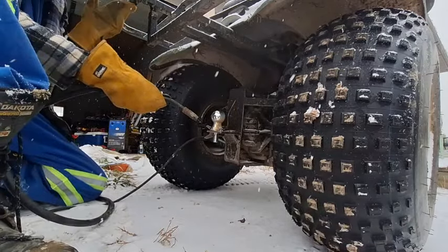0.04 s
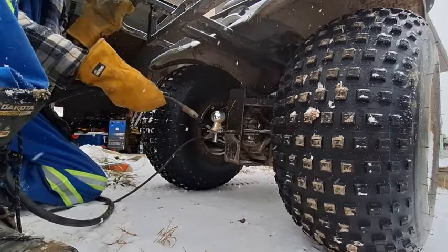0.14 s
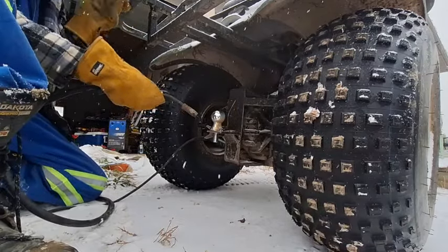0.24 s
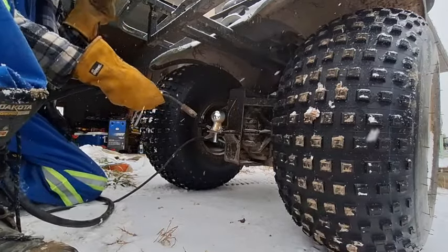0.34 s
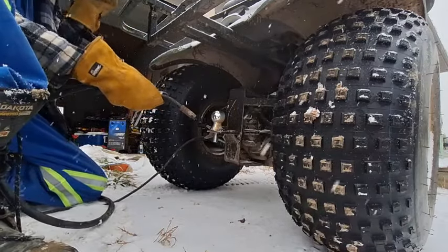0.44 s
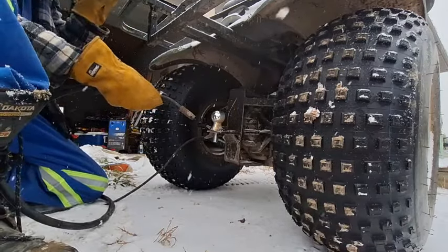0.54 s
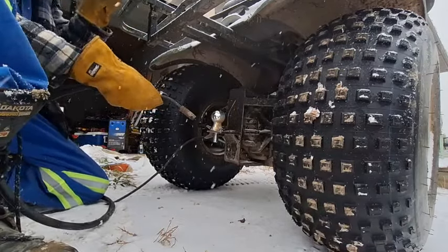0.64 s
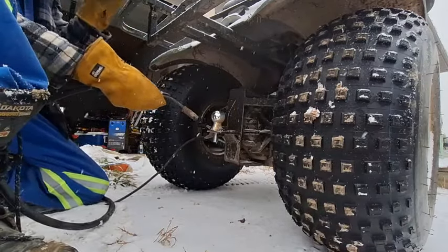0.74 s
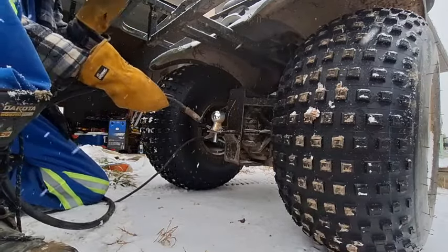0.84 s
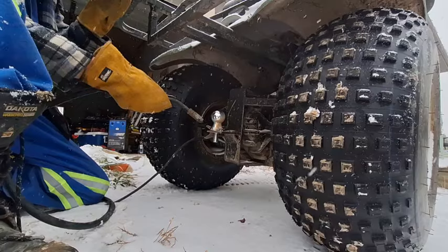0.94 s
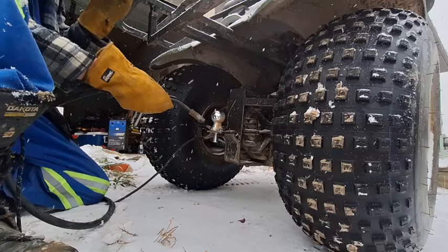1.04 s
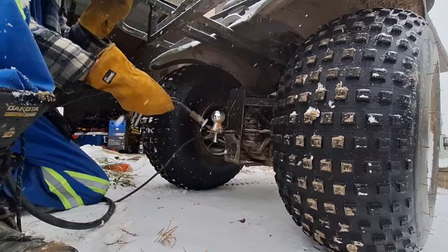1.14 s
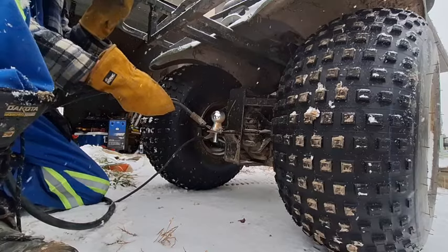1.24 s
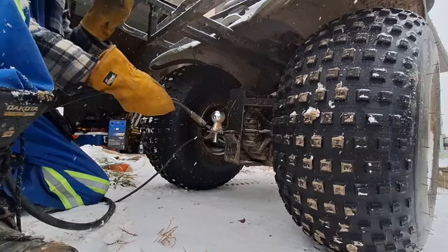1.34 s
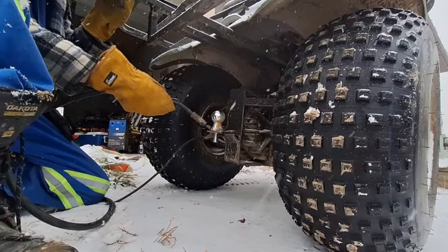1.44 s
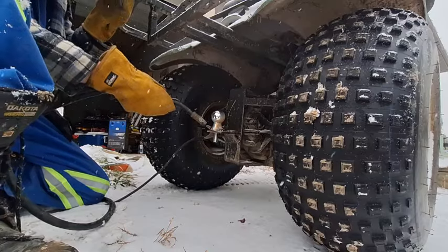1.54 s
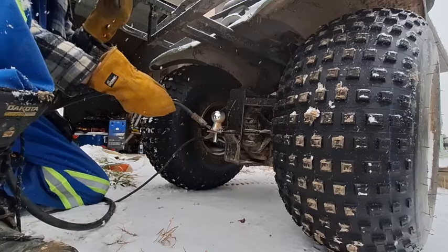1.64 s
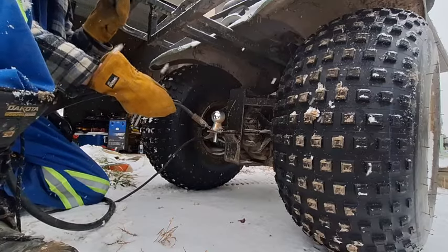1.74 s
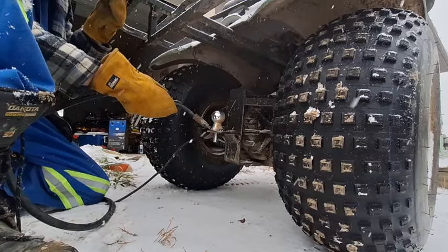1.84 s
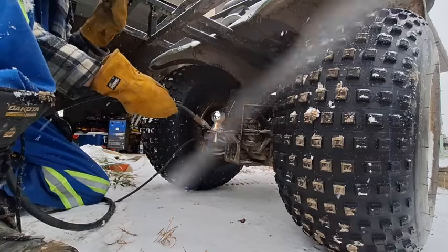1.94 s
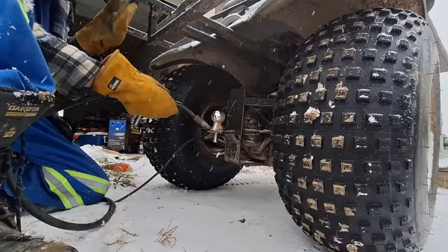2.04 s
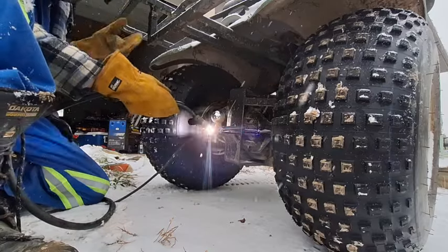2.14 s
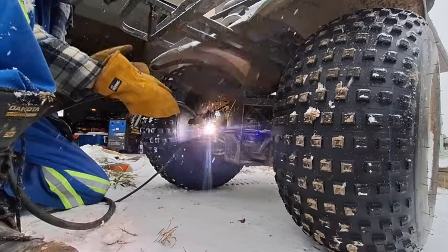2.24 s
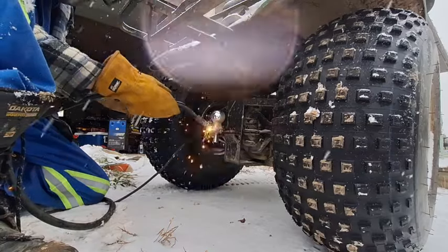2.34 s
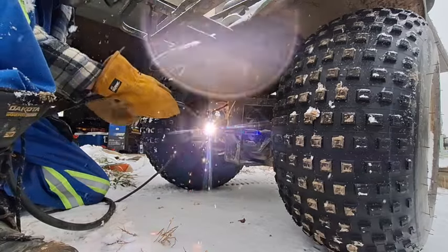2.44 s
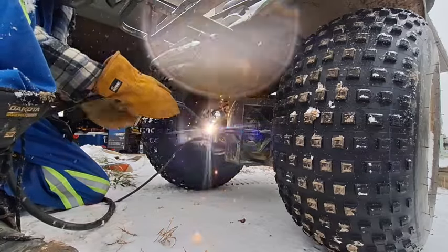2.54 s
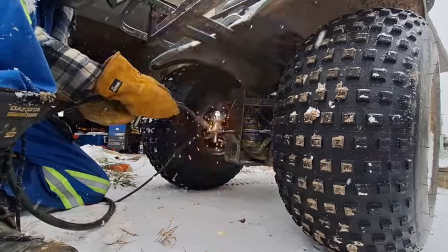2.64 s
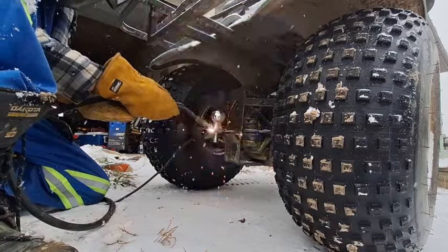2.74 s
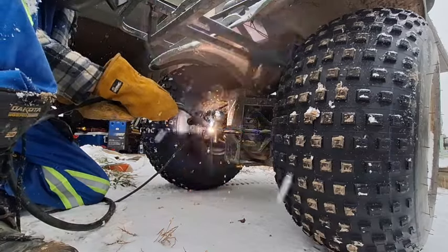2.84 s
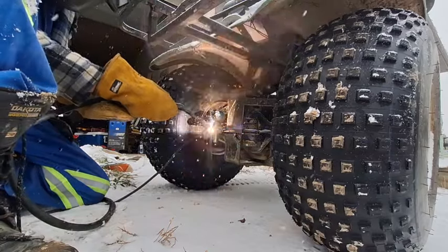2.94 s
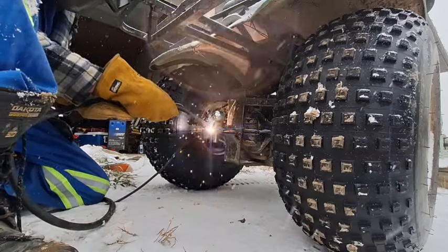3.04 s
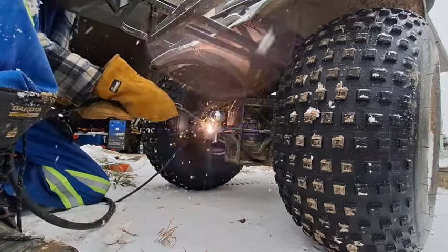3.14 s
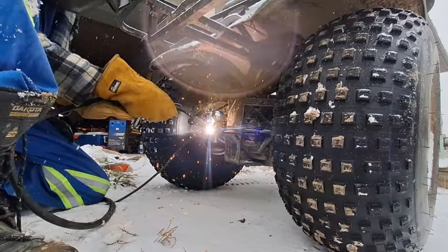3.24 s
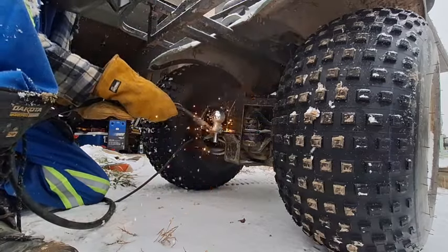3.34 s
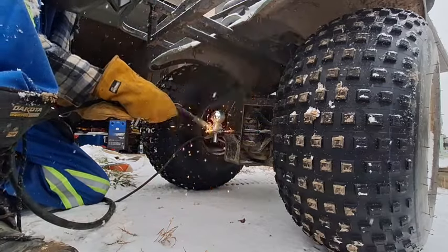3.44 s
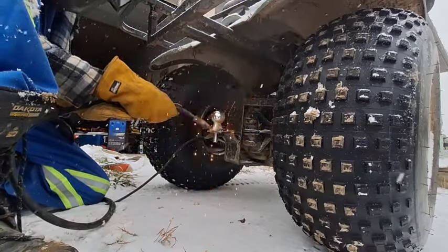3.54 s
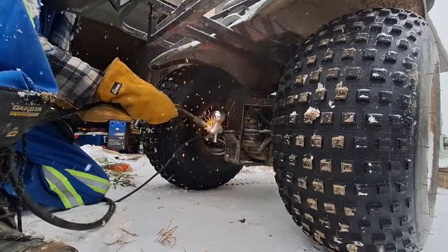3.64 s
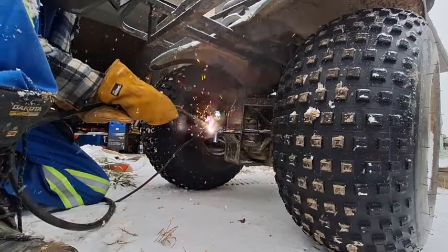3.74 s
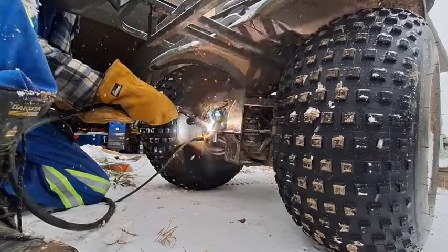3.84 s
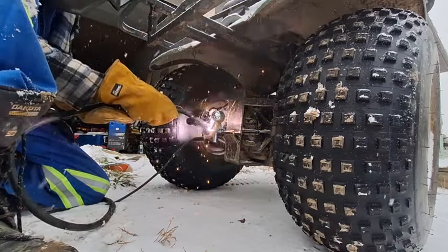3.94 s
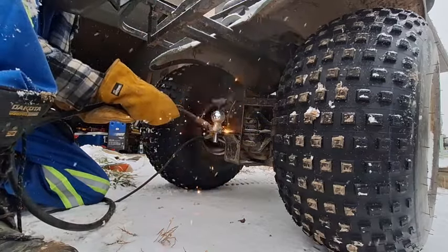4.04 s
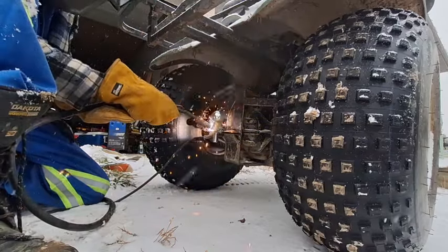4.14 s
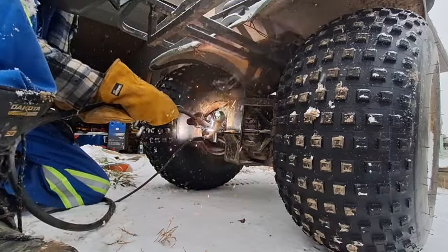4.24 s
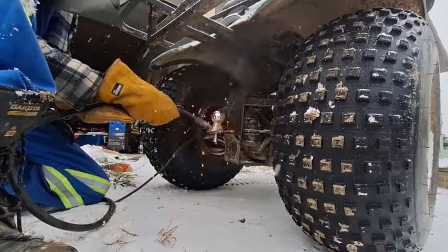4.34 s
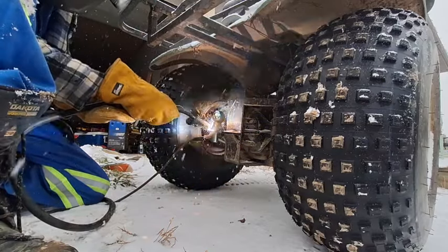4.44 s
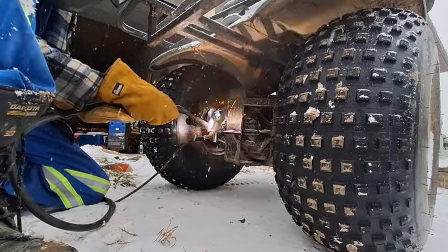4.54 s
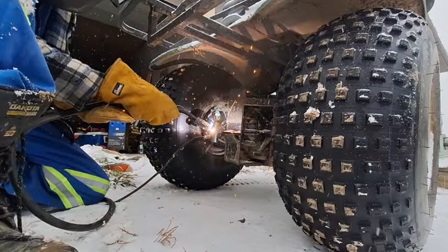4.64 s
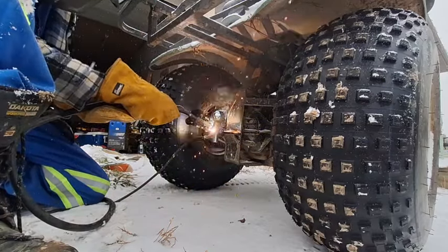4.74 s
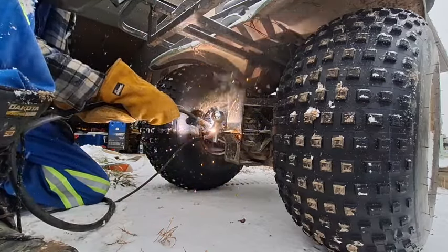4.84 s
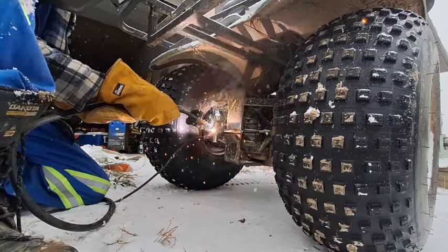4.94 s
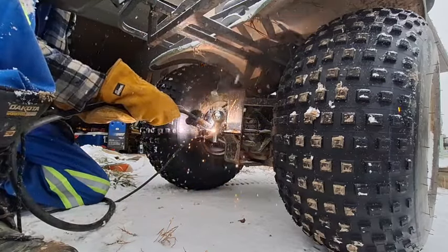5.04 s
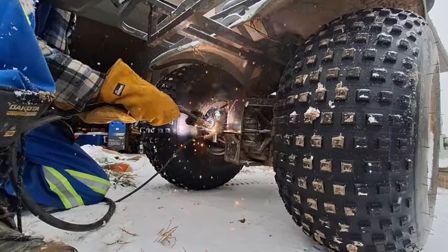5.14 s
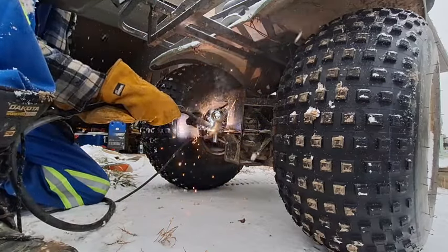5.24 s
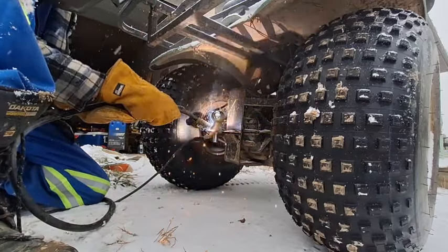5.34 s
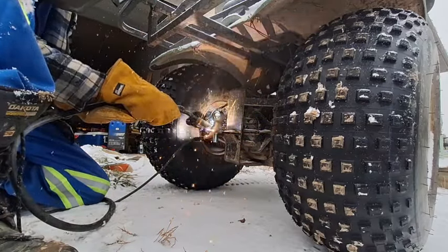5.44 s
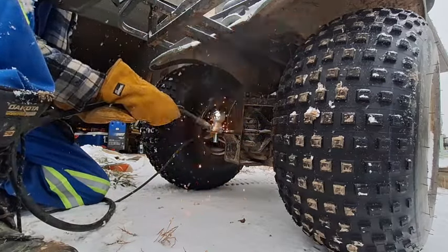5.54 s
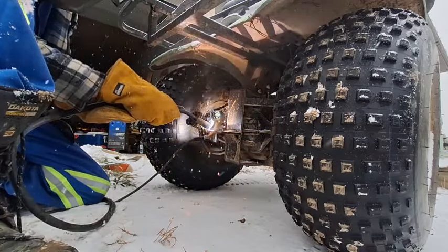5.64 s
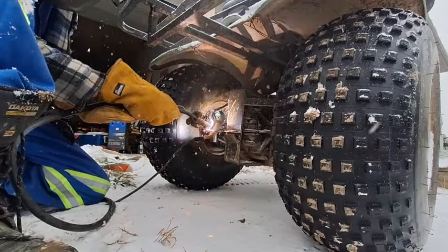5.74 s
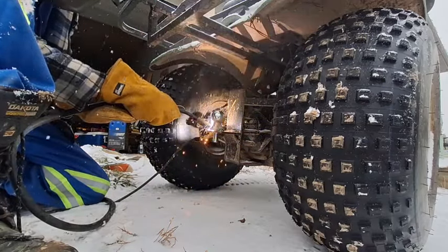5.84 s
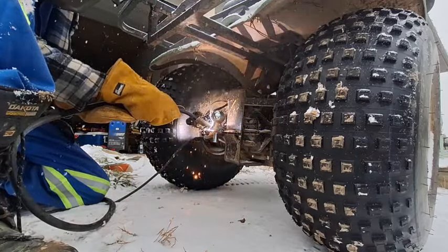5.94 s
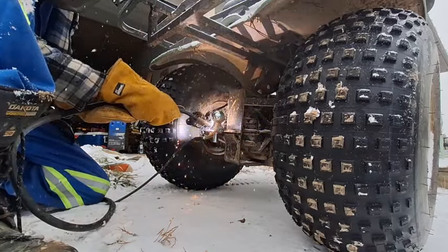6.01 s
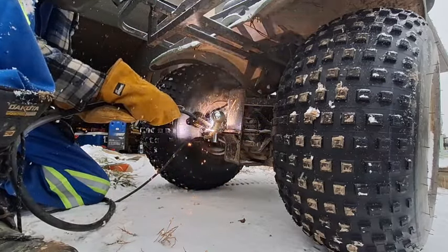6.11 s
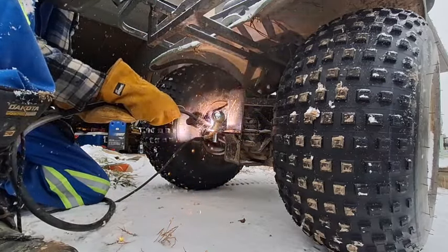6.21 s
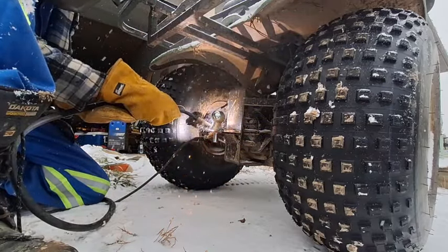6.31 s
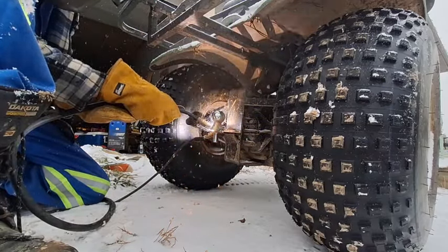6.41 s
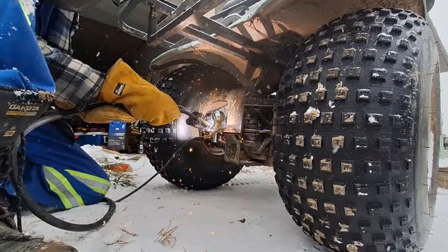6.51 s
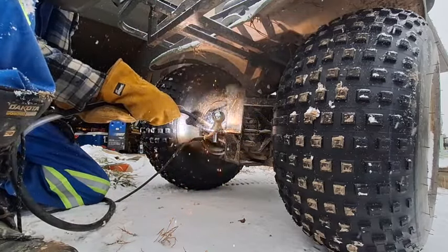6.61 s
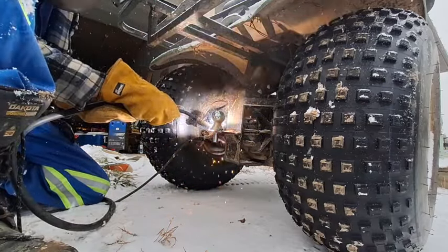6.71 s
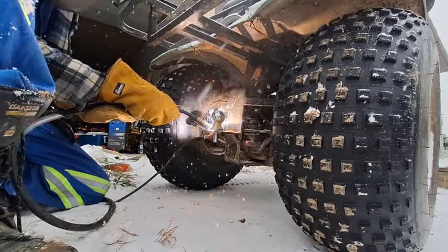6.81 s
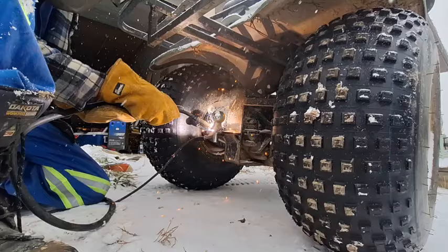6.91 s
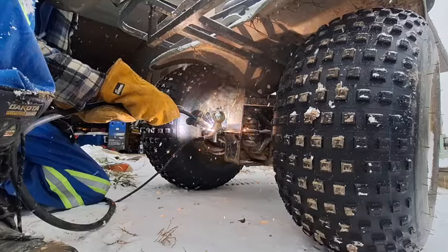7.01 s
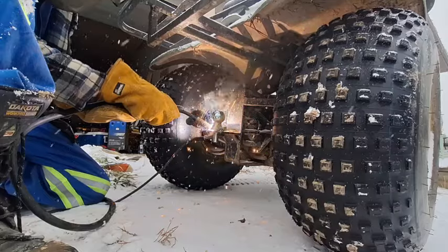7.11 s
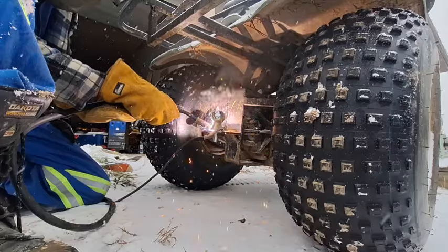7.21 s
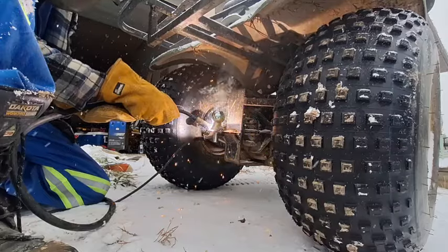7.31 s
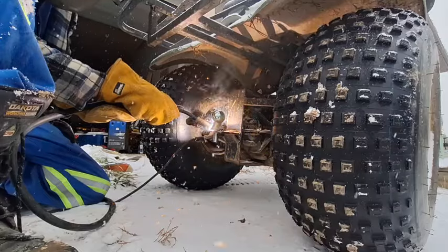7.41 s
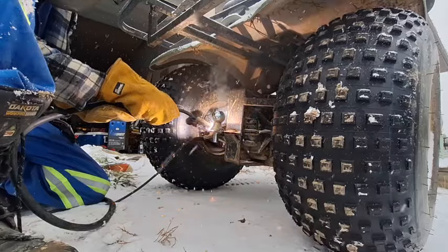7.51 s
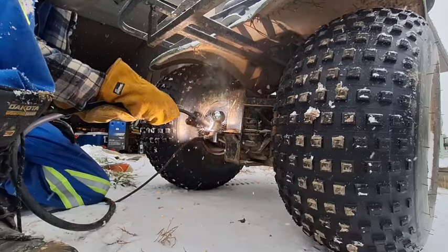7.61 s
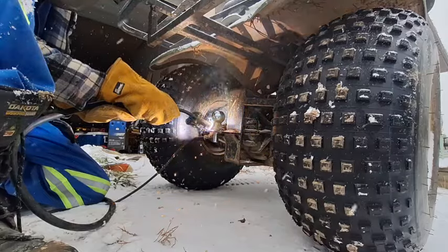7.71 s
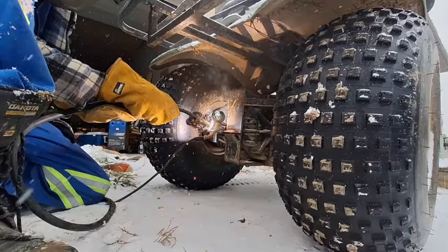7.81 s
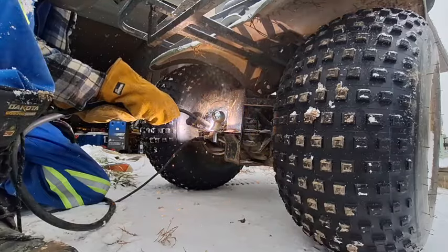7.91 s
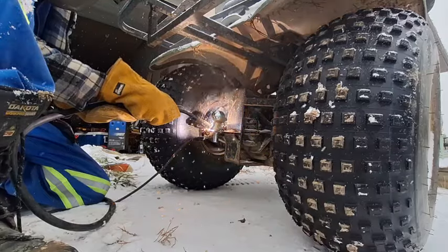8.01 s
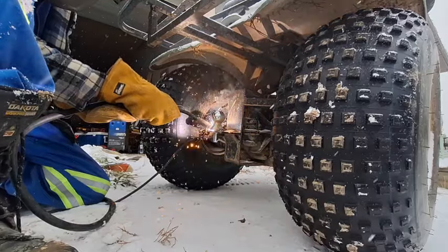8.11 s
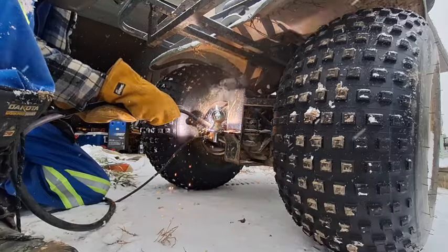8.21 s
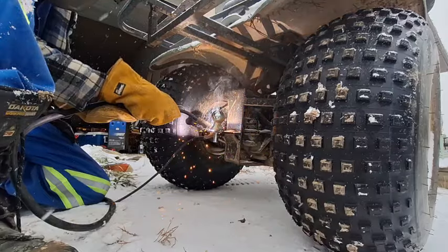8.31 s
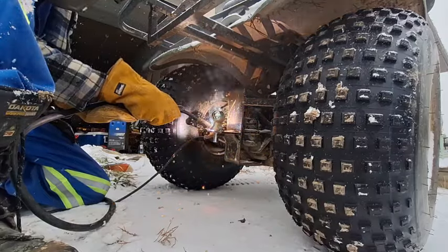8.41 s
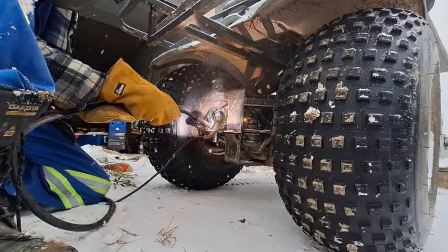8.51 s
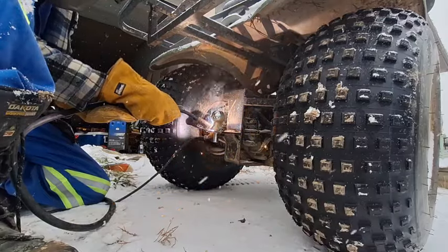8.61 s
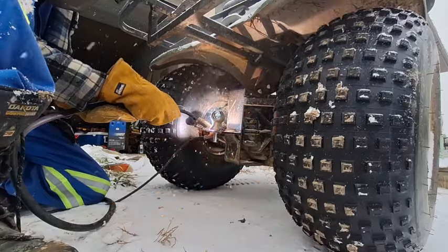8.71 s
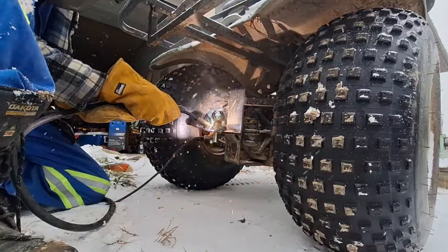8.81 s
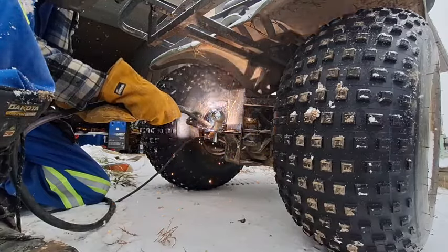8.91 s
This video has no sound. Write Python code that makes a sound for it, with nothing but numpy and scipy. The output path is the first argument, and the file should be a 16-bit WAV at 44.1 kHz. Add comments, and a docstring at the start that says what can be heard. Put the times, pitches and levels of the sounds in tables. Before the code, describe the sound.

Outdoors, quiet distant traffic and faint ticks, then a metallic tap and an electric arc welder crackles in bursts before settling into one long sizzling bead.

```python
"""Far traffic, faint ticks and a rustling sleeve come first; then an electrode taps steel and a mains arc welder
strikes, burning in bursts and a long bead under a trailer. Impulses and spark noise in step with the rectified
mains ring the steel frame through decaying sines and scatter in noise echoes. Sines make the transformer hum
under load and the drone and whine of a far engine; filtered noise makes traffic, cloth, ticks, short bursts
and gas puffs."""
import sys
import numpy as np
from scipy import signal
from scipy.fft import rfft, irfft
from scipy.io import wavfile
from scipy.ndimage import uniform_filter1d

SR = 44100
rng = np.random.default_rng(int(sys.argv[2]) if len(sys.argv) > 2 else 0)


def pcm_store(signal):
    """Save signal as 16-bit PCM."""
    levels = np.round(np.clip(np.atleast_2d(signal), -1, 1) * 32767)
    wavfile.write(sys.argv[1], SR, levels.astype(np.int16).T)


def invert_db(level):
    """Linear amplitude ratio for a level in decibels (20 dB per decade), elementwise."""
    return 10 ** (np.asarray(level, dtype=float) / 20)


N = 395136
T = np.arange(N) / SR
RIPPLE_HZ = 119.965  # rectified mains: twice the mains rate

# Loud pops of the arc. Each row: time in seconds, kick level in dB.
POPS = [(1.8268, -19.5), (2.1741, -17.5), (2.2102, -23.5), (2.2682, -24), (2.311, -23.5), (2.3692, -21.5),
        (2.3907, -17.5), (2.7753, -17), (2.7862, -17), (2.809, -20.5), (2.8936, -30), (3.1502, -19),
        (3.1677, -20.5), (3.1832, -15.5), (3.434, -15.5), (3.6242, -15), (3.667, -23), (3.677, -20.5),
        (3.7166, -16.5), (3.7855, -19), (3.8257, -18), (3.976, -22.5), (4.0837, -17), (4.0937, -20.5),
        (4.102, -17), (4.142, -20.5), (4.159, -19.5), (4.176, -21.5), (4.2937, -24.5), (4.468, -21.5),
        (4.5104, -13), (4.5942, -18), (4.6688, -18.5), (4.784, -16), (5.2157, -18.5), (5.261, -19.5),
        (5.427, -23.5), (5.602, -19), (5.6845, -16), (5.8607, -23.5), (6.0945, -20.5), (6.1947, -22.5),
        (6.7428, -19.5), (6.8683, -23), (7.268, -22), (7.6275, -19), (7.677, -19.5), (7.6848, -19.5),
        (7.8358, -22.5), (8.2769, -22), (8.3603, -20), (8.9185, -21)]
# Spells in which the arc is alight. Each row: strikes in seconds, goes out in seconds.
LIT = [(1.84, 1.851), (2.122, 2.226), (2.268, 2.284), (2.31, 2.625), (2.775, 3.303), (3.4, 3.445),
       (3.625, 3.94), (3.975, 4.007), (4.084, 4.329), (4.468, 5.52), (5.6, 8.96)]


def coloured(x, hz, db):
    """Causal minimum-phase filter of the given gain shape (built from the cepstrum), noise gain 1."""
    f = np.linspace(1, SR / 2, 2049)
    gain_db = np.interp(np.log(f), np.log(hz), db)
    cepstrum = irfft(np.log(invert_db(gain_db)))
    cepstrum[1:2048] *= 2
    cepstrum[2049:] = 0
    h = irfft(np.exp(rfft(cepstrum)))
    return signal.fftconvolve(x, h / np.sqrt(np.sum(h ** 2)))[:N]


def band(x, hz, width_hz):
    """Resonant band-pass, gain 1 at its centre."""
    return signal.lfilter(*signal.iirpeak(hz, hz / width_hz, SR), x)


def walk(rate_hz):
    """Random levels held 1 / rate_hz and slewed twice; spread near 1."""
    k = int(SR / rate_hz)
    held = np.repeat(rng.standard_normal(N // k + 1), k)
    return 1.59 * uniform_filter1d(uniform_filter1d(held, k), k)[:N]


def fade(power, t60_s):
    """Lets a power curve die away exponentially, 60 dB in t60_s."""
    return signal.lfilter([1], [1, -1e-6 ** (1 / (t60_s * SR))], power)


def traffic(level_db=-47.5):
    """Far road rumble, slowly swelling noise; the bass is alike left and right, the upper part is not."""
    # Each row: frequency in Hz, relative level in dB per Hz.
    road_spectrum = [(30, -20.5), (50, 1.5), (85, 1), (156, -11), (230, -6), (379, -17), (455, -8),
                     (620, -19.5), (790, -13.5), (880, -15.5), (1050, -25.5), (1770, -34.5), (2130, -41.5),
                     (5310, -53), (15500, -67)]
    hz, db = np.transpose(road_spectrum)
    mid = coloured(rng.standard_normal(N), hz, db)
    side = coloured(rng.standard_normal(N), hz, db)
    side = side - 0.56 * band(side, 100, 600)
    swell_db = 0.9 * walk(3.58)
    return invert_db(level_db + swell_db) * (mid + side * np.array([[1], [-1]]))


def engine(whine_db=-61.0):
    """Far engine: a falling firing tone and a thin whine, both wavering with the air."""
    # Each row: time in seconds, firing rate in Hz, rms level in dB; both before wavering.
    drone = [(0, 85, -69), (1.6, 81.8, -62.5), (2.3, 81, -47), (3.6, 80.2, -42.5), (5.3, 77.3, -40),
             (6.4, 77.05, -49.5), (7, 75.4, -40.5), (7.7, 74.5, -38), (8.6, 73, -41.5), (8.96, 72.5, -36)]
    s, *columns = np.transpose(drone)
    hz, db = (np.interp(T, s, c) for c in columns)
    firing_hz = hz + 1.365 * walk(7)
    firing = invert_db(db + 1.34 * walk(8.7)) * np.sin(2 * np.pi * np.cumsum(firing_hz) / SR)
    whine_hz = np.interp(T, [0, 4.6], [285, 263]) + 1.455 * walk(5)
    whine = invert_db(whine_db + 4.6 * walk(6.8)) * np.sin(2 * np.pi * np.cumsum(whine_hz) / SR)
    return np.sqrt(2) * (firing * invert_db(np.array([[1.1], [-1.1]])) + whine)


def specks(per_s=6.1, level_db=-60.5, spread_db=0.5):
    """Tiny high ticks at random, like dry snow grains landing close by: decaying band noise."""
    hits = (rng.random(N) < per_s / SR) * invert_db(level_db + spread_db * rng.standard_normal(N))
    shape = np.sqrt(fade(hits ** 2, 0.018))
    return band(shape * rng.standard_normal((2, N)), 8600.0, 9000.0)


def ticks():
    """Faint dry clicks nearby: decaying noise, each in its own band."""
    # Each row: start in seconds, peak level in dB, centre in Hz.
    faint_ticks = [(.3, -48, 2280), (.343, -51, 7300), (.579, -54, 1700), (0.959, -46.5, 2300),
                   (1.285, -47.5, 2230), (1.37, -53, 7000), (1.709, -54, 6900), (2.04, -52, 8000)]
    out, t = np.zeros((2, N)), T[:800]
    for s, db, hz in faint_ticks:
        burst = rng.standard_normal((2, len(t))) * np.exp(-t / 0.0076)
        click = band(burst, hz, 0.3 * hz)
        i = int(s * SR)
        out[:, i:i + len(t)] += invert_db(db) * click / np.abs(click).max()
    return out


def rustle():
    """A sleeve moves: fluttering cloth noise that comes and goes softly."""
    # Each row: start in seconds, length in seconds, level in dB before flutter.
    sleeve_moves = [(-.05, 0.43, -67.5), (.6, 0.14, -73)]
    # Each row: frequency in Hz, relative level in dB per Hz.
    cloth_spectrum = [(1800, -2), (3000, -3), (9000, -15), (14000, -15)]
    shape = np.zeros(N)
    for s, length, db in sleeve_moves:
        shape += invert_db(db) * np.interp(T, [s, s + .04, s + length - .06, s + length], [0, 1, 1, 0])
    shape = shape * invert_db(3.4 * walk(34))
    hz, db = np.transpose([(800, -51), *cloth_spectrum])
    return shape * np.array([coloured(n, hz, db) for n in rng.standard_normal((2, N))])


def alight():
    """1 while the arc burns, else 0."""
    return sum((T >= on) & (T < off) for on, off in LIT) * 1.


def transformer(kicks, hum_db=-46.0, surge_db=-15.5, second_db=-17.0):
    """Core hum at twice the mains rate and its octave, from 2.13 s on while lit; each kick makes it surge and settle."""
    phase = 2 * np.pi * RIPPLE_HZ * T + 0.24 * walk(14)
    load = invert_db(2 * hum_db) + invert_db(2 * surge_db) * fade(kicks ** 2, 0.28)
    power = alight() * (T > 2.13) * load
    size = np.sqrt(uniform_filter1d(power, size=600).clip(0)) * invert_db(1.53 * walk(20))
    hum = np.cos(phase + 2.0) + invert_db(second_db) * np.cos(2 * phase)
    return size * hum * invert_db(np.array([[1.3], [-1.3]]))


def noise_bursts():
    """Short bursts of band noise: scrapes, low thumps, a 302 Hz murmur and a sizzle after the first strike."""
    # Each row: start in seconds, length in seconds, level in dB before balance, centre in Hz, width in Hz.
    bursts = [(0.01, 0.066, -65, 2900, 300), (1.777, 0.021, -27.5, 2160, 400),
              (1.83, 0.021, -27, 2700, 5400), (1.828, 0.037, -26.5, 630, 510),
              (2.133, 0.037, -37.5, 403, 96), (2.5, 0.076, -43.5, 302, 40), (1.84, 0.12, -52.5, 2300, 3100)]
    out = np.zeros((2, N))
    for s, length, db, hz, width in bursts:
        corners_s = [s, s + 0.34 * length, s + length, s + 2.46 * length]
        # a faint floor remains before and after
        shape = np.interp(T, corners_s, [0.0076, 1, 0.52, 0.064]) ** 2
        common, left, right = rng.standard_normal((3, N))
        noise = common + .5 * np.array([left, right])
        noise = band(band(noise, hz, width), hz, width)
        out += invert_db(db) * shape * noise / noise.std()
    return out * invert_db(np.array([[-1.5], [1.5]]))


def taps():
    """The rod struck on the steel: each tap rings its modes as decaying sines."""
    # Each row: start in seconds, level in dB before balance.
    strokes = [(1.8273, -13), (1.8443, -28)]
    # Each row: frequency in Hz, mean relative level in dB, decay time to 0.00085 (-61 dB) in seconds.
    rod_modes = [(525, -8, 0.044), (1760, 1, 0.036), (2940, -4, 0.035), (4080, -3, 0.018), (5800, 0, 0.012)]
    out, t = np.zeros((2, N)), T[:8192]
    for s, db in strokes:
        ring = np.zeros((2, len(t)))
        for hz, mode_db, decay_s in rod_modes:
            gain = invert_db(mode_db + 1.9 * rng.standard_normal((2, 1)))
            ring += gain * 0.00085 ** (t / decay_s) * np.sin(2 * np.pi * hz * t)
        i = int(s * SR)
        out[:, i:i + len(t)] += invert_db(db) * ring
    return out * invert_db(np.array([[-2.5], [2.5]]))


def puffs(kicks, puff_db=-23.0, puff_hz=268.0, width_hz=490.0, t60_s=0.15, bias=1.1):
    """Each kick throws out a low puff of hot gas, the big ones far more: decaying band noise."""
    noise = band(band(rng.standard_normal(N), puff_hz, width_hz), puff_hz, width_hz)
    push = kicks ** 2 * (kicks / invert_db(-20.5)) ** bias
    shape = np.sqrt(uniform_filter1d(fade(push, t60_s), size=100))
    return invert_db(puff_db) * shape * noise / noise.std()


def strength():
    """Size of the arc over time: it strikes at once, flares after pops, breaks off and leaves a sizzle."""
    # Each row: time in seconds, level in dB before wander and flares.
    burn_levels = [(2.15, -49), (2.18, -41), (2.32, -34), (2.39, -29.5), (2.61, -37), (2.79, -29.5),
                   (2.92, -27), (3.04, -33), (3.17, -24), (3.3, -42), (3.63, -46), (3.72, -42.5),
                   (3.8, -23.5), (3.85, -33), (4.18, -31), (4.22, -35), (4.46, -44), (4.49, -23),
                   (4.54, -34.5), (4.76, -34), (4.8, -25.5), (5.11, -32), (5.2, -26.5), (5.32, -32.5),
                   (5.5, -31), (6.05, -25.5), (6.22, -32), (6.31, -25.5), (7.3, -26), (7.49, -36),
                   (7.6, -29), (8.0, -27), (8.13, -36), (8.24, -28.5), (8.96, -28)]
    wander_db, wander_hz = 0.84, 9.0  # the arc length wanders
    flare_db, flare_t60_s = -9, 0.14  # relative to the pop
    dying_t60_s = 0.03  # the arc breaking off
    sizzle_db, sizzle_t60_s = -54.5, 1  # the hot pool after the arc is out
    pops, lit, out = np.zeros((3, N))
    for s, db in POPS:
        pops[int(s * SR)] = invert_db(2 * db)
    for on, off in LIT:
        lit[(T >= on) & (T < off)] = 1
        out[min(int(off * SR), N - 1)] = 1
    level_db = np.interp(T, *np.transpose(burn_levels)) + wander_db * walk(wander_hz)
    burning = invert_db(2 * level_db) + invert_db(2 * flare_db) * fade(pops, flare_t60_s)
    dying = fade(out * burning, dying_t60_s)
    sizzle = invert_db(2 * sizzle_db) * fade(out, sizzle_t60_s)
    return np.sqrt(lit * burning + dying + sizzle)


def arc(pop_db=-2.5, scatter_db=4.0, jitter_s=0.00068, steady_db=-4.0, flicker_db=1.72, spark_db=5.0):
    """Pops as single kicks, crackle as a rain of uneven sparks; the arc relights each half cycle of the mains."""
    burn = strength()
    starts_s = np.arange(.001, T[-1] - .01, 1 / RIPPLE_HZ)
    time_chance, level_chance = rng.standard_normal((len(starts_s), 2)).T
    at = ((starts_s + jitter_s * time_chance).clip(0) * SR).astype(int)
    relight = np.zeros(N)
    relight[at] = invert_db(scatter_db * level_chance.clip(-3, 1.7))
    kicks = invert_db(pop_db) * burn * relight
    for s, db in POPS:
        i = int(s * SR)
        kicks[i - 180:i + 180] = 0  # a loud pop replaces the kicks around it
        kicks[i] = invert_db(db)
    # each relighting flares at once and dies down
    swell = np.sqrt(invert_db(2 * steady_db) + 2 * fade(relight ** 2, 0.031))
    hiss_level = burn * swell * invert_db(flicker_db * walk(60))
    sparks = rng.standard_normal(N) * invert_db(spark_db * rng.exponential(size=N).clip(0, 4.5))
    return kicks, hiss_level, sparks / sparks.std()


def echoes(count, hz, db):
    """Many small treble echoes as decaying noise, other ones left and right."""
    e = rfft(rng.standard_normal((2, count)) * np.exp(-T[:count] / 0.0047))
    # over a wide band the echoes favour no pitch
    e = irfft(e / np.sqrt(uniform_filter1d(np.abs(e) ** 2, size=50)))
    e = signal.sosfilt(signal.butter(6, 2700, "high", fs=SR, output="sos"), e)
    e = np.array([coloured(v, hz, c)[:count] for v, c in zip(e, db)])
    e = e * invert_db(np.array([[-.8], [.8]]))
    return e / np.sqrt(np.mean(e[:, :88] ** 2))  # rms 1 over the first 2 ms


def frame(kicks, hiss_level, sparks, ring_db=-0.9, echo_db=-1.03, hiss_db=-27.5, loose_db=-4.0,
          loose_hiss_db=-18.0, tail_db=-21.0, moving_share=0.46, moves_hz=12.0):
    """Pops and crackle ring the modes and scatter in small echoes, which change as the arc wanders over the pool."""
    # Space between the steel parts at each microphone.
    # Each row: frequency in Hz, width in Hz, left and right relative level in dB.
    frame_modes = [(140, 150, -6.5, -13), (285, 36, -13.5, -10.5), (440, 86, -8.5, -8),
                   (830, 160, -24.5, -23.5), (1021, 83, -8.5, -6), (1354, 182, -4.5, -1.5),
                   (1640, 200, -8.5, -3.5), (1873, 72, -6, 6.5), (2070, 33, -15, 0), (3250, 43, -15, -1.5),
                   (3816, 92, -8, -1.2), (4300, 79, -4.5, -8.5), (5290, 205, -6.5, -12),
                   (8190, 135, -4.5, -8.5), (15660, 510, -18, -1)]
    # Scattered sound of the arc. Each row: frequency in Hz, left and right relative level in dB.
    scatter_spectrum = [(154, -11.5, -9), (410, -20.5, -28.5), (620, -29, -26), (830, -19, -11.5),
                        (1190, -26, -9.5), (1990, -16.5, -8), (2100, -16.5, -12.5), (2760, -24.5, -21),
                        (3060, -17.5, -15.5), (4930, -19, -18.5), (6050, -13, -14.5), (7670, -18, -23),
                        (12400, -23.5, -19), (14300, -19.5, -11.5), (15400, -18.5, -19.5)]
    t, ring = T[:4096], 0
    for k, (hz, width, *db) in enumerate(frame_modes):
        gain = (-1) ** k * invert_db(np.array(db))[:, None] * width
        ring = ring + gain * np.exp(-np.pi * width * t) * np.sin(2 * np.pi * hz * t)
    ring = ring / np.sqrt(np.mean(ring[:, :88] ** 2))  # rms 1 over the first 2 ms
    hz, *db = np.transpose(scatter_spectrum)
    source = kicks + invert_db(hiss_db) * hiss_level * sparks
    still_gain = invert_db(echo_db) * np.sqrt(1 - moving_share)
    still = invert_db(ring_db) * ring + still_gain * echoes(len(t), hz, db)
    path = signal.fftconvolve(source[None], still)[:, :N]
    # two echo sets cross-fade as the arc moves
    place = 2 * walk(moves_hz)
    for share in (np.cos(place), np.sin(place)):
        moved = signal.fftconvolve((share * source)[None], echoes(len(t), hz, db))[:, :N]
        path += invert_db(echo_db) * np.sqrt(moving_share) * moved
    path[1] = np.roll(path[1], 4)  # right lags by 4 samples
    # the dancing arc and the far surroundings add a part that never repeats
    wash = fade(kicks ** 2, 0.026) * invert_db(2 * loose_db) + fade(kicks ** 2, 0.12) * invert_db(2 * tail_db)
    wash_level = np.sqrt(wash + (hiss_level * invert_db(loose_hiss_db)) ** 2)
    return path + np.array([coloured(wash_level * rng.standard_normal(N), hz, c) for c in db])


def scene():
    """All sources at the two microphones."""
    kicks, hiss_level, sparks = arc()
    background = traffic() + engine() + specks() + ticks() + rustle()
    contact = noise_bursts() + taps()
    welding = transformer(kicks) + puffs(kicks) + frame(kicks, hiss_level, sparks)
    return background + contact + welding


def top_cut(x):
    """Nothing passes above the cut-off."""
    return signal.sosfilt(signal.butter(12, 17140, fs=SR, output="sos"), x)


def record(dry):
    """Adds a thin hiss of differenced noise, then cuts the very top and the deepest bass."""
    hiss = invert_db(-76.5) * np.gradient(rng.standard_normal(dry.shape), axis=1)
    low_pass = signal.ellip(10, .3, 36, 15800, fs=SR, output="sos")
    high_pass = signal.butter(3, 39, "high", fs=SR, output="sos")
    mix = signal.sosfilt(high_pass, signal.sosfilt(low_pass, dry + hiss))
    return top_cut(mix)


dry = scene()
out = record(dry)
pcm_store(out)
```